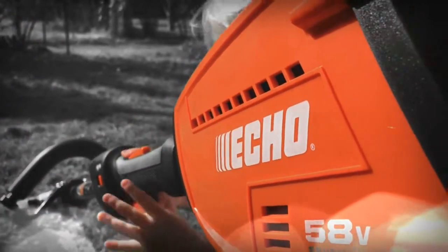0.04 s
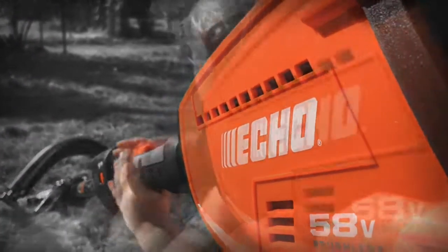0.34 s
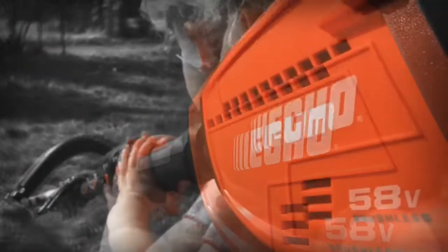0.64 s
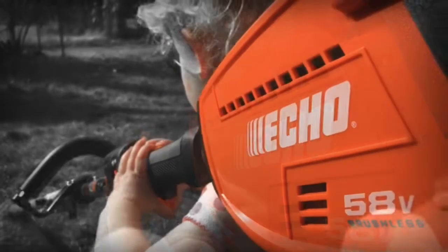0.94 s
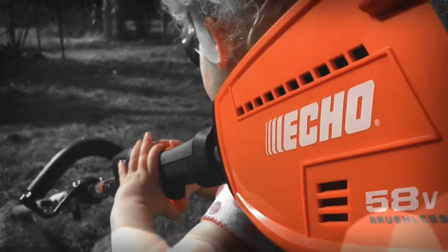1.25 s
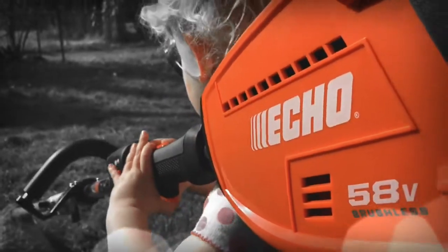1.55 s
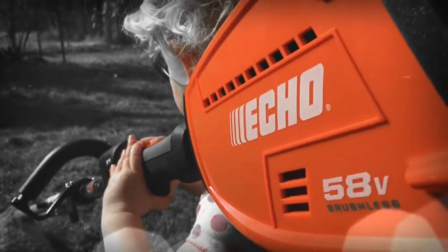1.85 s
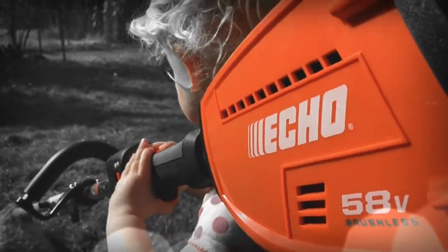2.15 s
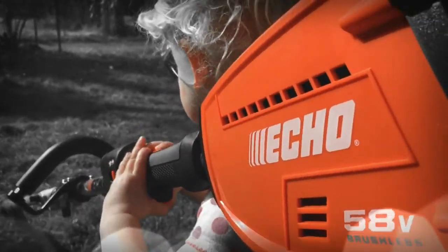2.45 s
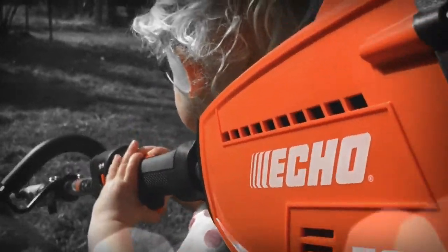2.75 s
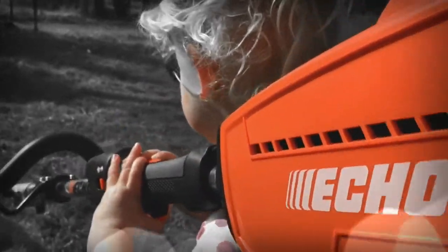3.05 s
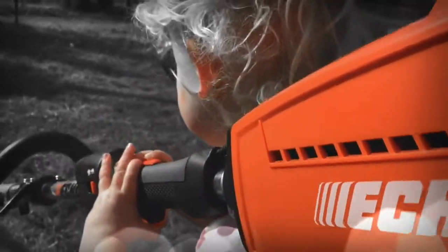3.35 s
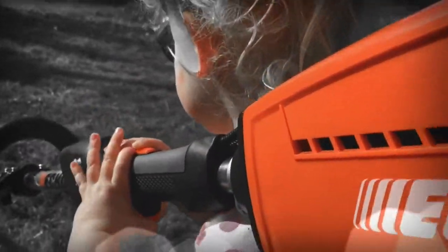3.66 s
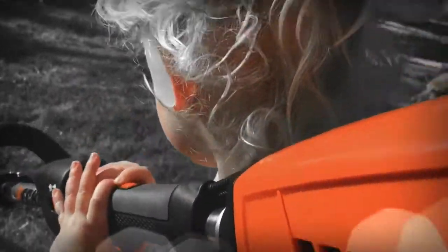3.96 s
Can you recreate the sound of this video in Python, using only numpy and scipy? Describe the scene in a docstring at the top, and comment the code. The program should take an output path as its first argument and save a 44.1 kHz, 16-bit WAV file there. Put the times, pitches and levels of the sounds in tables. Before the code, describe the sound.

Close plastic clicks, then an electric grass trimmer spins up with a rising whine outdoors.

```python
"""A hand brushes along a plastic grip, close by, over the outdoor hum of a far engine.
The lock and trigger of a cordless grass trimmer click, the drive catches and the motor whines up to speed.
Gear teeth rattle the housing, the controller's switching sings near 10 kHz, and fan and line whirl the air.
The line flails and slaps briefly, then runs free in a steady whirr."""
import sys
import numpy as np
from scipy import signal
from scipy.fft import rfft, irfft
from scipy.io import wavfile
from scipy.ndimage import uniform_filter1d

SR = 44100
rng = np.random.default_rng(int(sys.argv[2]) if len(sys.argv) > 2 else 0)


def transcribe(signal):
    """Save signal, clipped to [-1, 1], as a 16-bit WAV file at the path in sys.argv[1]."""
    frames = np.atleast_2d(signal).T
    limited = np.clip(frames, -1, 1)
    pcm = np.round(limited * 32767).astype(np.int16)
    wavfile.write(sys.argv[1], SR, pcm)


N = 176400
T = np.arange(N) / SR
FULL_SPEED_HZ, HEAD_RATIO = 155, .716  # head turns per motor turn

# Shaft and gear tones: multiple of motor speed, then relative level/dB at each of SHAFT_TIMES
SHAFT_TONES = [(0.5, -48.0, -45.0, -38), (1.0, -37.0, -38.0, -40), (1.5, -38.0, -38.0, -38),
               (2.5, -40.0, -34.0, -42), (3.0, -32.0, -35.0, -42), (3.5, -44.0, -39.0, -39),
               (4.5, -30.0, -33.0, -35), (5.0, -39.0, -38.0, -32), (6.5, -30.0, -32.0, -36),
               (7.0, -26.0, -30.0, -40), (7.5, -35.0, -37.0, -36), (8.0, -46.0, -32.0, -40),
               (9.0, -44.0, -31.0, -36), (10.0, -44.0, -33.0, -46), (11.0, -46.0, -42.0, -36),
               (11.5, -43.0, -40.0, -37)]
# Breakpoints of the shaft tones' mix: t/s
SHAFT_TIMES = [2.92, 3.22, 3.6]
# Cutting head tones: multiple of head speed, relative level/dB
HEAD_PARTIALS = [(1, -41.5), (2, -35), (3, -36.5), (5, -40.5), (6, -37.5)]
def drive_whine(speed, turns):
    """Shaft, gears and head sing at multiples of their speeds, louder as the motor gets faster."""
    rise_db = 1 + 115 * np.log10(np.clip(speed / FULL_SPEED_HZ, 1e-3, 1))
    shaft = sum(tone(k * turns, rise_db + np.interp(T, SHAFT_TIMES, db), flutter_db=1.3)
                for k, *db in SHAFT_TONES)
    head = sum(tone(k * HEAD_RATIO * turns, rise_db + db, flutter_db=1.3) for k, db in HEAD_PARTIALS)
    duck_db = -7 * np.clip((2.76 - T) * 20, 0, 1)  # held back until the line runs free
    return from_db(duck_db) * (shaft + head)


# Gear tone swells: multiple of motor speed, peak t/s, half length/s, level/dB, roughness (0-1)
GEAR_SWELLS = [(30, 1.96, .085, -26, .55), (24, 2.07, .06, -26, .2), (28, 2.13, .025, -26, .1),
               (10.5, 2.125, .085, -24, .1), (21, 2.165, .045, -18, .1), (21, 2.29, .18, -29, .35),
               (14, 2.57, .13, -25, .2), (14, 2.95, .3, -34, .2), (7.5, 2.58, .17, -24.5, .25),
               (19, 3.44, .075, -23.5, .05), (24, 3.87, .15, -36, .1), (30, 3.83, .2, -37, .1)]
def gear_swells(turns, lag_s=.0072, waver_hz=110):
    """Gear tones bloom, waver and sink back as they sweep through resonances."""
    far_turns = np.interp(T - lag_s, T, turns)  # the gears at the shaft's far end are heard later
    swells = np.zeros(N)
    for multiple, peak_s, half_s, db, rough in GEAR_SWELLS:
        window = np.exp(-np.abs((T - peak_s) / half_s) ** 3)
        waver = rough * drift(waver_hz) / (2 * np.pi)
        whine = tone(multiple * far_turns + waver, db, flutter_db=1.5)
        swells += window * whine * (1 + rough * drift(waver_hz) / 2)
    return swells


# Envelope of the air rush: t/s, level/dB
AIR_ENVELOPE = [(1.57, -80), (1.63, -52), (1.8, -38), (2.0, -31.5), (2.15, -26.5), (2.35, -26), (2.5, -23),
                (2.8, -23.5), (3.3, -22.5), (3.7, -23), (4, -23.5)]
# EQ of the air rush: f/Hz, level/dB
AIR_EQ = [(30, -21), (70, -11), (130, -10.5), (300, -5.5), (430, -3), (620, -2), (850, 4), (1250, 2.5),
          (1750, 5.5), (2150, -16), (2700, -5), (3500, -8.5), (4500, -12), (6000, -8), (7700, -14.5),
          (9300, -11), (12000, -17.5), (15500, -29)]
def whirled_air(speed, turns):
    """Fan and line whirl up a rush that buzzes and throbs with every turn of the shaft."""
    throb = 1 + .17 * np.cos(2 * np.pi * turns)
    rush = rng.standard_normal(N) * throb * from_db(drift(68))
    buzz = from_db(-10.5) * np.sqrt(speed / FULL_SPEED_HZ) * meshing(turns, count=160)
    fade_in = np.minimum(speed / 4, 1)
    return from_db(in_time(AIR_ENVELOPE)[0]) * colour(rush + buzz, AIR_EQ) * fade_in


# Envelope of the gear rattle: t/s, level/dB
RATTLE_ENVELOPE = [(1.56, -71), (1.6, -41), (1.635, -32), (1.68, -32), (1.8, -28.5), (1.97, -26.5),
                   (2.25, -28.5), (2.55, -25.5), (3, -29.5), (4, -32)]
# Housing resonances: f/Hz, width/Hz, relative level/dB
HOUSING_MODES = [(417, 150, -10), (805, 45, -1), (1054, 126, -2.5), (1241, 144, 2.5), (1740, 93, -1.5),
                 (1968, 67, 6.5), (2333, 117, 4), (2495, 51, 5), (2703, 47, 2.5), (3033, 152, -0.5),
                 (4560, 170, -15.5)]
def gear_rattle(speed, turns, teeth=17):
    """Teeth knock unevenly and set the housing ringing."""
    knocks = die_away(strikes(teeth * turns, spread_db=.5), seconds=.0028) * rng.standard_normal(N)
    knocks /= np.sqrt(uniform_filter1d(knocks ** 2, size=1300).clip(0) + 1e-3)  # level over 30 ms
    whine = from_db(-5) * np.sqrt(speed / FULL_SPEED_HZ) * meshing(turns, count=240)
    housing = sum((-1) ** k * from_db(db) * resonate(knocks + whine, hz, width)
                  for k, (hz, width, db) in enumerate(HOUSING_MODES))
    return from_db(in_time(RATTLE_ENVELOPE)[0]) * rms_one(housing)


# Switching tone mix: t/s, carrier level/dB, lower sideband level/dB, upper sideband level/dB
SWITCH_MIX = [(1.57, -49, -42, -72), (1.65, -40.5, -51, -53), (1.98, -38, -36.5, -45),
              (2.06, -35.5, -42, -35.5), (2.27, -33.5, -29.5, -30.5), (2.6, -37, -33.5, -41),
              (2.9, -33.5, -39, -29.5), (3.05, -28.5, -34, -33), (3.25, -38, -36.5, -38),
              (3.47, -40, -24, -39), (3.6, -40, -36.5, -44), (3.75, -38, -28.5, -41), (3.94, -32, -34, -36)]
def controller(speed, turns, switch_hz=9993.5, pole_pairs=7, rasp_width_hz=2100):
    """The switching tone in a thin rasp; its sidebands sit one motor field frequency to each side."""
    tones = sum(tone(switch_hz * T + side * pole_pairs * turns, db, flutter_db=2)
                for side, db in zip((0, -1, 1), in_time(SWITCH_MIX)))
    band = resonate(rng.standard_normal(N), switch_hz, rasp_width_hz)
    rasp = from_db(-52.5) * rms_one(resonate(band, switch_hz, rasp_width_hz))
    return (tones + rasp) * np.minimum(speed / 8, 1)


# Envelope of the line's flutter: t/s, level/dB
FLAIL_ENVELOPE = [(1.8, -75), (1.98, -41), (2.1, -35.5), (2.36, -29), (2.48, -27), (2.6, -28.5),
                  (2.72, -27), (2.78, -38), (4, -91)]
# EQ of flutter and slaps: f/Hz, level/dB
FLAIL_EQ = [(35, -32), (85, 10), (150, 1), (400, 1.5), (1200, -0.5), (3500, -23), (7000, -10), (15000, -14)]
# Hardest slaps of the line: t/s, level/dB
LINE_SLAPS = [(2.418, -14), (2.444, -13), (2.477, -9.5), (2.489, -16), (2.510, -9), (2.544, -9),
              (2.624, -15), (2.727, -7)]
# Sharp ticks of the line's tips: t/s, level/dB
TIP_TICKS = [(2.054, -18), (2.098, -14), (2.125, -19.5), (2.286, -17), (2.453, -20), (2.584, -20),
             (2.67, -12)]
# Bright EQ of the ticks: f/Hz, level/dB
TICK_EQ = [(1000, -15), (5500, 5), (15000, -5)]
def flailing_line(speed, turns, line_ends=2, jitter_turns=.2):
    """Both line ends snap on each turn of the head, with slaps and ticks, until the line runs free."""
    swings = np.maximum.accumulate(HEAD_RATIO * turns + jitter_turns * drift(40) * (speed > 0))
    snaps = die_away(strikes(line_ends * swings, spread_db=2), seconds=.003) * rng.standard_normal(N)
    flutter = from_db(in_time(FLAIL_ENVELOPE)[0]) * colour(snaps, FLAIL_EQ)
    slaps = bursts(LINE_SLAPS, FLAIL_EQ, decay_s=.0016)
    ticks = bursts(TIP_TICKS, TICK_EQ, decay_s=.0006)
    return flutter + slaps + ticks


# Grip, lock, trigger and drive clicks:
# t/s, ring level/dB, ring centre f/Hz, ring spread/octaves, crack level/dB, tail level/dB
CLICK_CUES = [(0.6398, -15, 1600, 0.31, -51, -58), (0.6425, -14.5, 1090, 0.36, -23.5, -44.5),
              (0.6495, -24, 1050, .4, -39, -58), (0.695, -27, 2770, 0.75, -14.5, -49),
              (0.6959, -6.5, 954, 0.61, -11, -38), (0.989, -34, 1690, 0.41, -43.5, -70),
              (1.013, -32.5, 1760, 0.43, -46, -55.5), (1.4903, -40, 1380, 1.5, -34.5, -52.5),
              (1.552, -14.5, 2470, 0.41, -35, -48), (1.5551, -9.5, 2560, 0.21, -43, -42.5),
              (1.555, -17.5, 1080, 0.16, -43, -65)]
# Modes of the plastic body: f/Hz, relative level/dB, t60/s
BODY_MODES = [(380, -14, 0.2), (542, -15.5, 0.082), (773, -7, 0.063), (977, -6.5, 0.053),
              (1071, -6.5, 0.06), (1234, -4.5, 0.028), (1393, -8, 0.065), (1592, -10.5, 0.055),
              (1880, -3.5, 0.036), (2320, -4, 0.017), (2640, -6, 0.022), (3000, -3, 0.01)]
# Bright EQ of the crack: f/Hz, level/dB
CRACK_EQ = [(200, -20.5), (900, 3), (3500, 9), (5500, 0.5), (9500, -1), (15000, -11.5)]
# Dark EQ of the tail: f/Hz, level/dB
TAIL_EQ = [(150, -12), (400, 8.5), (1000, 4), (2500, -1.5), (5000, -15), (10000, -21), (15000, -31)]
def clicks():
    """Each click is a crack, a ring of the plastic body and a faint tail."""
    times, ring_db, centre_hz, octaves, crack_db, tail_db = np.transpose(CLICK_CUES)
    body = np.zeros(N)
    for k, (hz, mode_db, t60) in enumerate(BODY_MODES):
        gains = from_db(ring_db + mode_db) / (1 + (np.log2(hz / centre_hz) / octaves) ** 2)
        body += (-1) ** k * ring(impulses(times, gains), hz, t60)
    crack = die_away(impulses(times, from_db(crack_db)), seconds=.002) * noise(CRACK_EQ)
    tail = die_away(impulses(times, from_db(tail_db)), seconds=.033) * noise(TAIL_EQ)
    return body + crack + tail


# Envelopes of the hand slide: t/s, rub level/dB, hiss level/dB
BRUSH_ENVELOPES = [(0, -89, -82), (.1, -66, -67), (.24, -56, -66), (.36, -49, -64), (.41, -51, -88),
                   (.56, -55.5, -69), (.65, -76, -88)]
# Soft EQ of the rub: f/Hz, level/dB
RUB_EQ = [(200, -11), (420, -10.5), (600, 0.5), (750, -10.5), (1100, -21), (1800, -30.5), (4000, -42)]
# Airy EQ of the hiss: f/Hz, level/dB
HISS_EQ = [(500, -12.5), (2000, 0), (5000, -8), (12000, -6.5), (15000, -7)]
def hand_on_grip():
    """Skin brushes along the grip with an uneven rub and a light hiss."""
    rub_db, hiss_db = in_time(BRUSH_ENVELOPES)
    rub = from_db(rub_db + 2 * drift(30)) * noise(RUB_EQ)
    return rub + from_db(hiss_db) * noise(HISS_EQ)


# Pitch of the engine's second partial: t/s, f/Hz
ENGINE_PITCH = [(0, 131), (.3, 137.5), (1.5, 133), (1.9, 124)]
# Fader ride on the engine: t/s, relative level/dB
ENGINE_RIDE = [(0, -1.5), (.27, 9), (.42, 3.5), (.57, 7), (.68, 0.5), (1.5, 0.5), (1.9, 3), (4, -21)]
# Engine partials: multiple of the firing rate, level/dB before the ride
ENGINE_PARTIALS = [(1, -47), (2, -43), (3, -60.5)]
def far_engine():
    """A far engine hums at multiples of its firing rate."""
    firings = np.cumsum(in_time(ENGINE_PITCH)[0] / 2) / SR
    ride_db = in_time(ENGINE_RIDE)[0]
    return sum(tone(k * firings, db + ride_db, flutter_db=3) for k, db in ENGINE_PARTIALS)


# EQ of the outdoor bed: f/Hz, level/dB
RUMBLE_EQ = [(25, -17), (45, -12.5), (65, -1.5), (100, 6), (135, 4), (200, -8), (300, -18.5), (450, -24.5),
             (700, -15.5), (1000, -23.5), (2000, -35), (5000, -40.5), (15000, -48.5)]
def outdoor_rumble():
    """A low, steady bed of open-air noise."""
    return from_db(-48.5) * noise(RUMBLE_EQ)


def meshing(turns, count, lowest=24, size=8192):
    """Uneven teeth repeat their pattern every two turns: a dense comb of harmonics, rms 1."""
    harmonics = np.r_[np.zeros(lowest), np.exp(2j * np.pi * rng.random(count - lowest))]
    return rms_one(np.interp(turns / 2 % 1 * size, np.arange(size), irfft(harmonics, size)))


def tone(cycles, db, flutter_db):
    """A sine whose level and phase flutter."""
    gain = from_db(db + flutter_db * drift(8))
    return gain * np.sin(2 * np.pi * (cycles + rng.random()) + .1 * flutter_db * drift(10))


def bursts(rows, eq, decay_s):
    """A short noise burst for each row of t/s, level/dB."""
    times, db = np.transpose(rows)
    envelope = die_away(impulses(times, from_db(db)), decay_s)
    return colour(envelope * rng.standard_normal(N), eq) * np.sqrt(np.mean(envelope ** 2))


def strikes(cycles, spread_db):
    """One click of random strength per cycle."""
    gains = from_db(spread_db * np.clip(rng.standard_normal(N), -2, 2))
    return np.diff(np.floor(cycles), prepend=0) * gains


def impulses(times, gains):
    """Clicks at the given times."""
    return np.bincount((times * SR).astype(int), gains, N)[:N] + 1e-18


def die_away(x, seconds):
    """Give each click an exponential decay."""
    return signal.lfilter([1], [1, -np.exp(-1 / (seconds * SR))], x + 1e-18)


def ring(x, hz, t60):
    """A unit click sets a sine of height 1 ringing."""
    r, w = np.exp(-np.log(1000) / (t60 * SR)), 2 * np.pi * hz / SR
    return signal.lfilter([0, np.sin(w)], [1, -2 * r * np.cos(w), r * r], x)


def resonate(x, hz, width):
    """Resonant band-pass with a peak gain of 1."""
    r, w = np.exp(-np.pi * width / SR), 2 * np.pi * hz / SR
    return signal.lfilter(np.array([1, 0, -1]) * (1 - r * r) / 2, [1, -2 * r * np.cos(w), r * r], x + 1e-18)


def colour(x, eq, size=2 ** 18):
    """Minimum-phase EQ; the result has rms 1, so only the curve's shape counts."""
    hz, db = np.transpose(eq)
    bins_hz = np.arange(size // 2 + 1) * SR / size
    gain = from_db(np.interp(np.log(bins_hz + 1), np.log(hz), db))
    cepstrum = irfft(np.log(gain))
    cepstrum[1:size // 2] *= 2  # folding the cepstrum makes the filter causal
    cepstrum[size // 2 + 1:] = 0
    return rms_one(irfft(rfft(x, size) * np.exp(rfft(cepstrum)))[:N])


def noise(eq):
    """Coloured noise, rms 1."""
    return colour(rng.standard_normal(N), eq)


def drift(hz, step=40):
    """Smooth random modulation with a spread of 1."""
    r = np.exp(-2 * np.pi * hz * step / SR)
    slow = signal.lfilter([1], [1, -2 * r, r * r], rng.standard_normal(N // step + 2002))[2000:]
    return np.interp(np.arange(N) / step, np.arange(len(slow)), rms_one(slow))


def in_time(rows):
    """Join breakpoints by straight lines: one curve for each column after t/s."""
    times, *columns = np.transpose(rows)
    return [np.interp(T, times, column) for column in columns]


def from_db(db):
    """Decibels to gain."""
    return 10 ** (np.asarray(db) / 20)


def rms_one(x):
    """Scale to unit rms."""
    return x / np.sqrt(np.mean(x ** 2) + 1e-20)


# Motor run-up and settling: t/s, rotation f/Hz
MOTOR_SPEED = [(1.565, 0.0), (1.75, 37.06), (2.1, 104.36), (2.25, 131.14), (2.42, 160.85), (2.52, 172.59),
               (2.6, 177.26), (2.73, 171.18), (2.83, 174.09), (2.97, 172.53), (3.15, 167.77),
               (3.27, 163.86), (3.48, 159.21), (3.63, 153.57), (3.8, 151.36), (4.0, 149.48)]
def scene():
    """One motor speed drives the trimmer's running layers; handling and background join them in mono."""
    speed = in_time(MOTOR_SPEED)[0]
    turns = np.cumsum(speed) / SR
    trimmer = drive_whine(speed, turns) + gear_swells(turns) + controller(speed, turns)
    trimmer += gear_rattle(speed, turns) + whirled_air(speed, turns) + flailing_line(speed, turns)
    return (trimmer + clicks() + hand_on_grip() + far_engine() + outdoor_rumble())[None]


def record(dry, ceiling=.95, cutoff_hz=15600):
    """A soft clip rounds the highest peaks and a steep low-pass cuts the top."""
    rounded = dry / (1 + (dry / ceiling) ** 4) ** .25
    return signal.sosfilt(signal.ellip(12, .1, 80, cutoff_hz, fs=SR, output="sos"), rounded)


dry = scene()
out = record(dry)
transcribe(out)
```